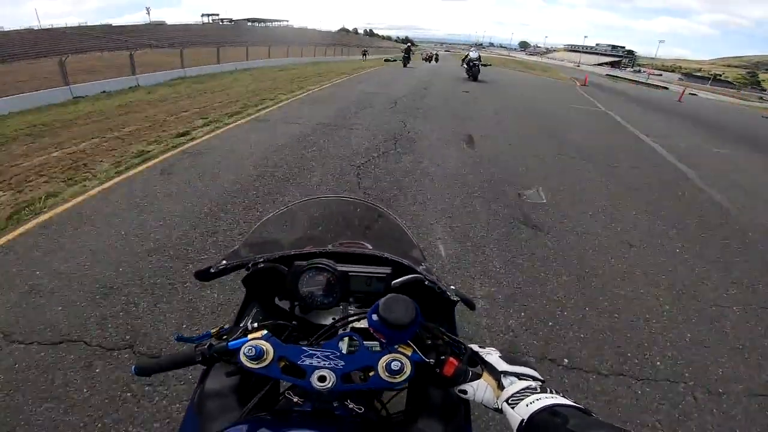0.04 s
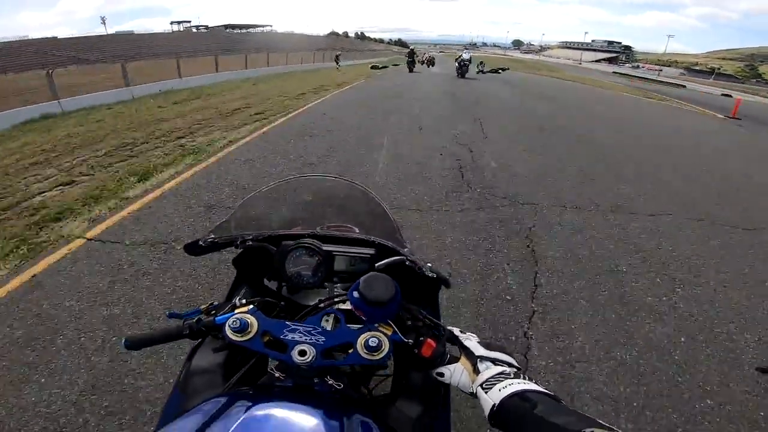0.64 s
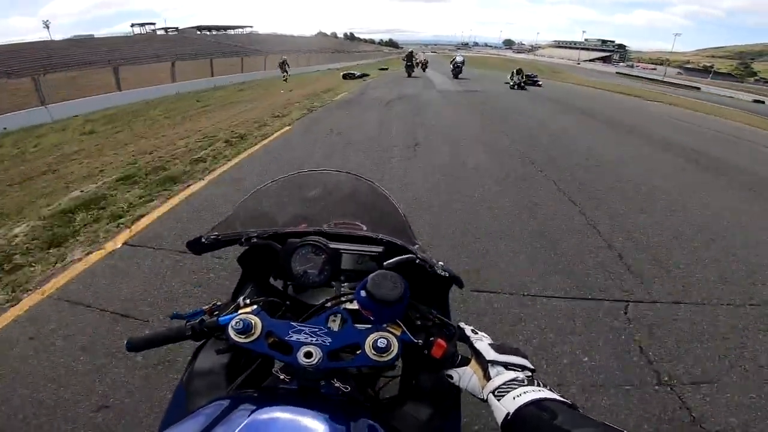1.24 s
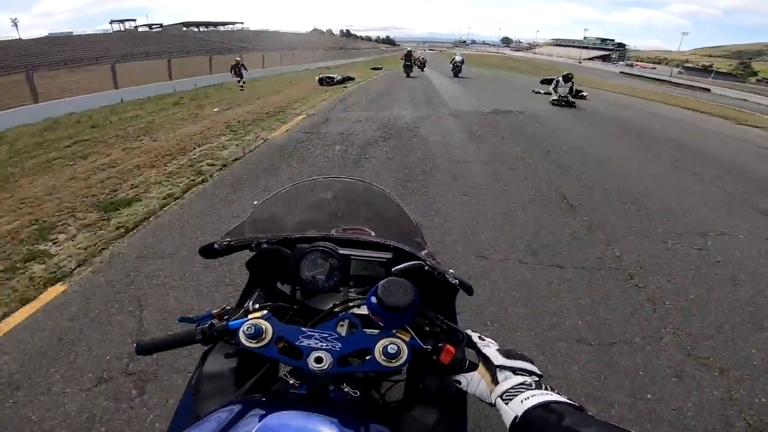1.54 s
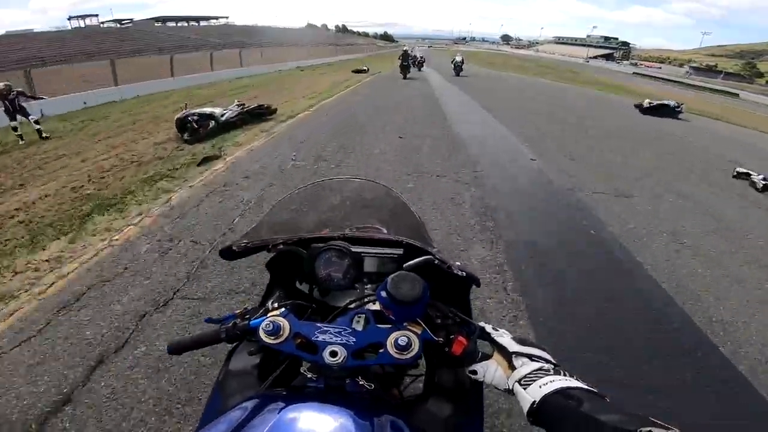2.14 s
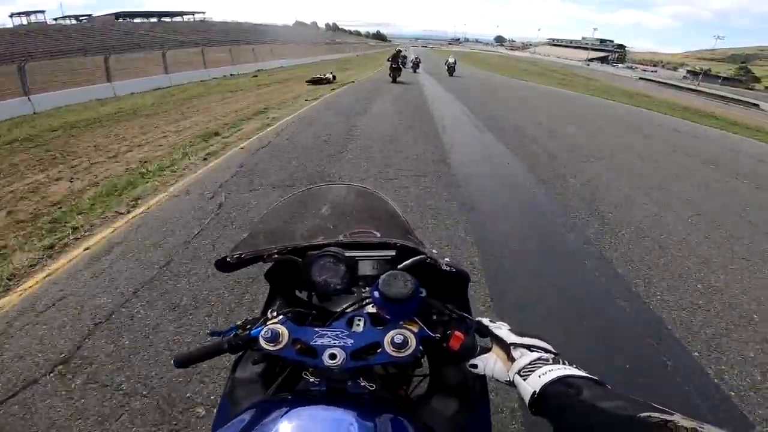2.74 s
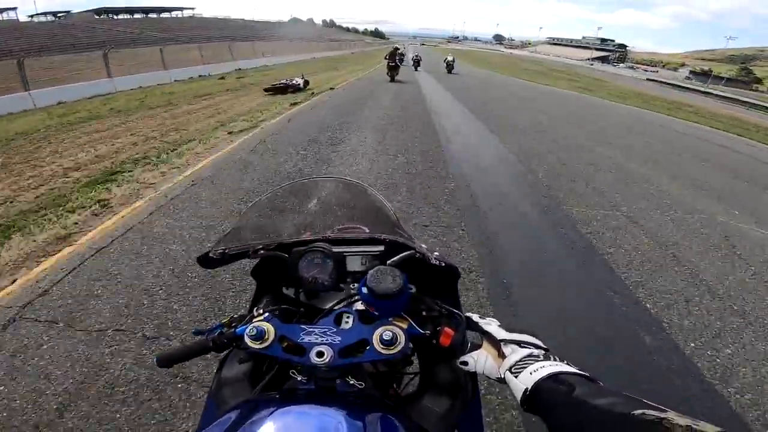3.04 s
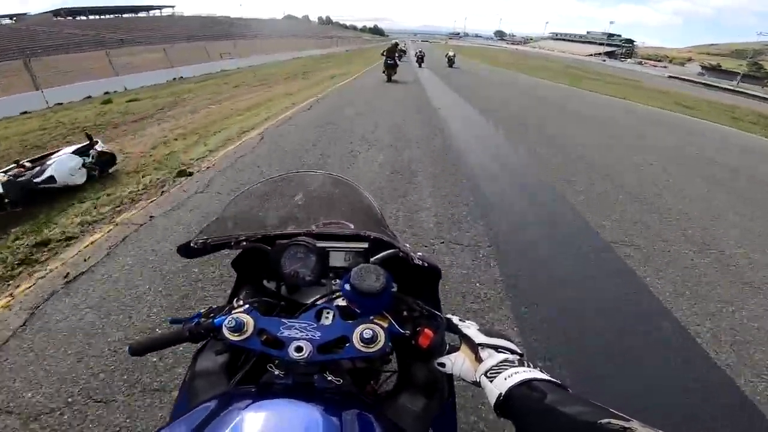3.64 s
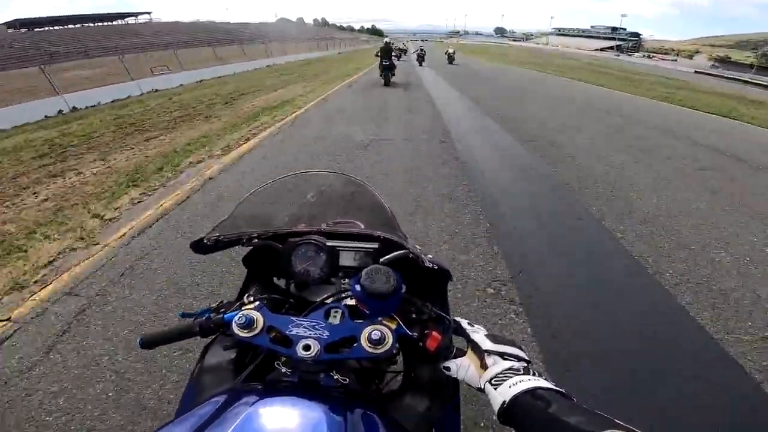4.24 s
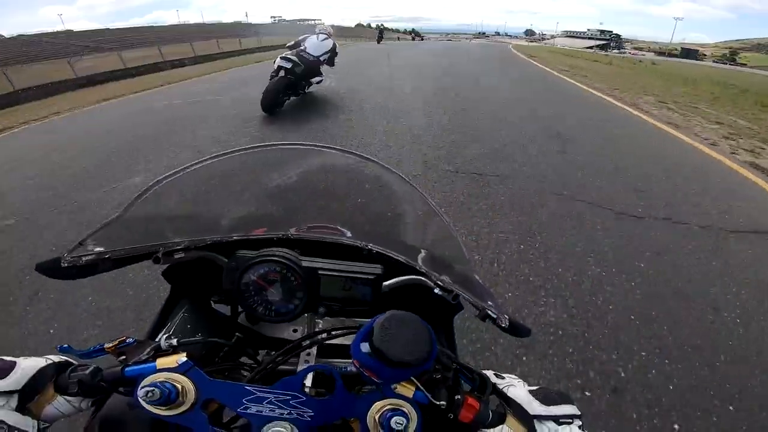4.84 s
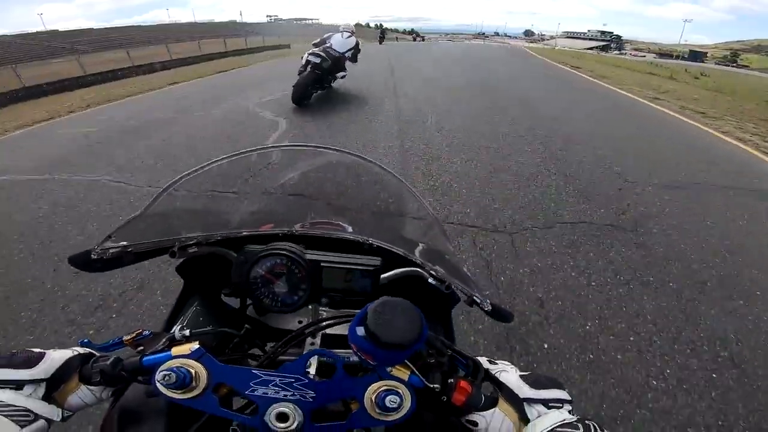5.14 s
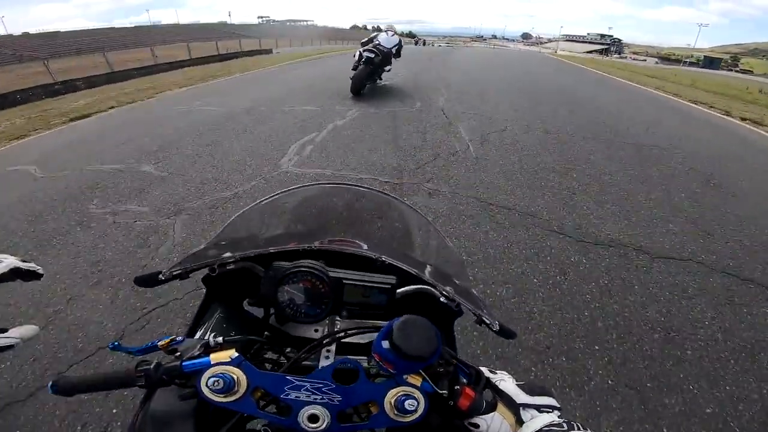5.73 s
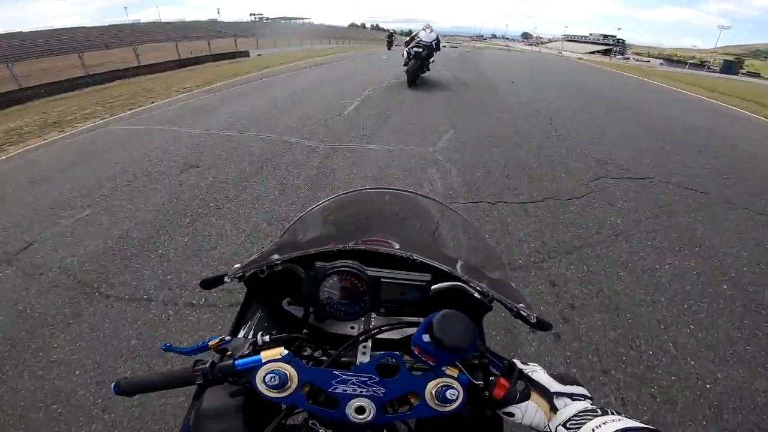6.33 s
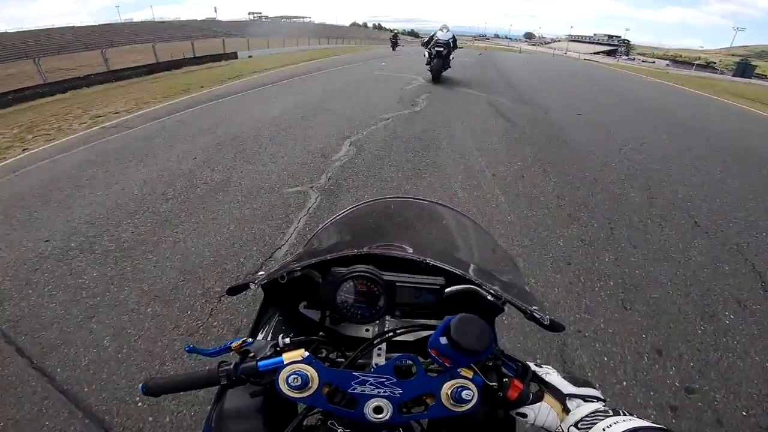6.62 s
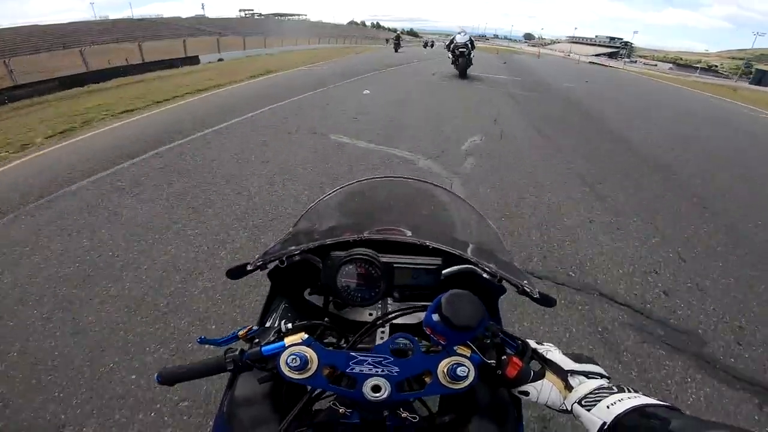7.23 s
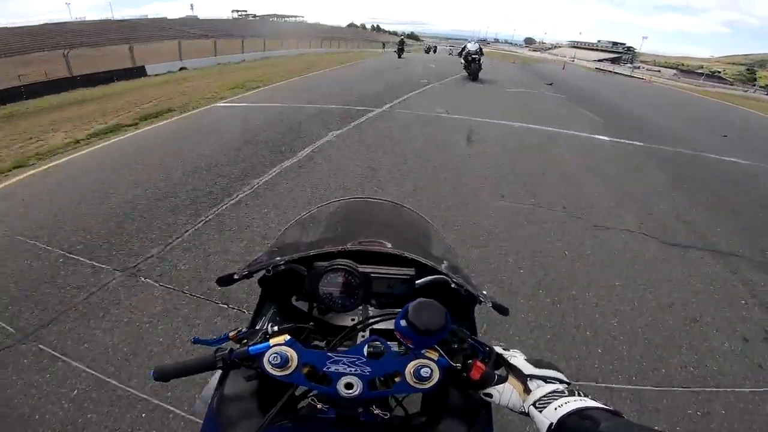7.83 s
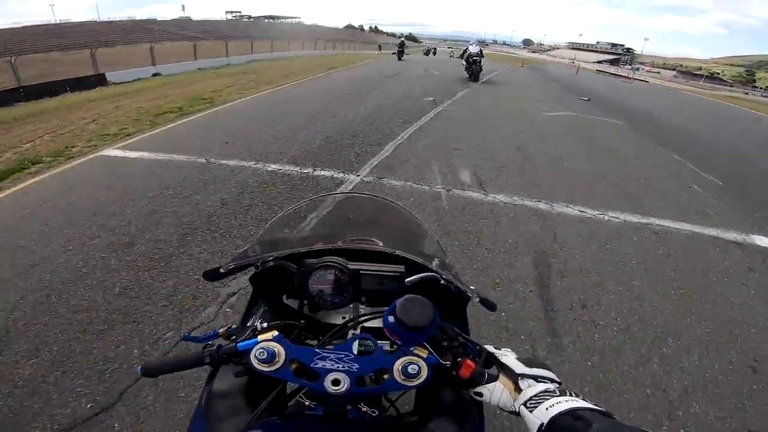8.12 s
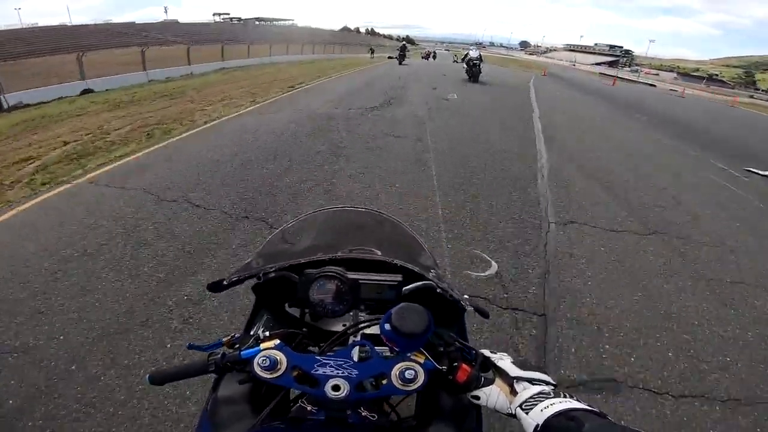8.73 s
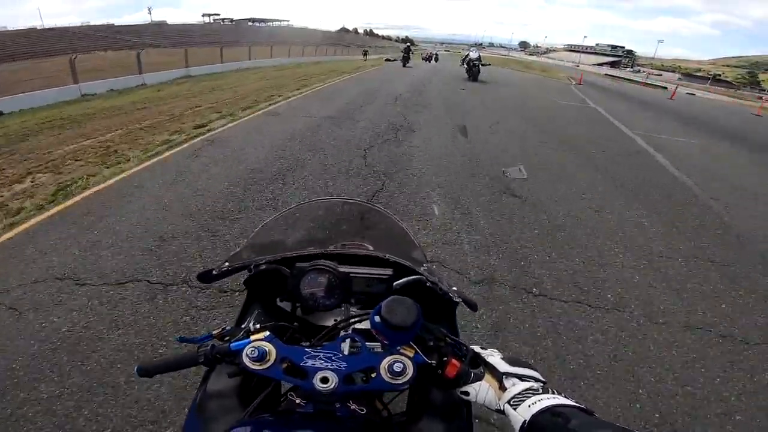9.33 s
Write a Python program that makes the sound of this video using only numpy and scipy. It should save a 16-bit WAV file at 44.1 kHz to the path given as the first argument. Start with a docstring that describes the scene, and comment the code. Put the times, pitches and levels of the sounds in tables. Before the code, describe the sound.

A four-cylinder motorcycle coasts down a race track with the throttle shut, its falling exhaust tone wrapped in gusty wind on an on-board microphone. Faint gear whine and thin brake squeal run through it, a nearby bike swells briefly, and a few stones hit the bodywork. An abrupt jump leads to a slower, duller stretch, where another bike's drone fades away and a light chain rattle grows.

```python
"""Wind buffeting and the sinking exhaust note of a four-cylinder sport bike, heard on board, throttle shut.
Gears whine through casing resonances, panels and brake discs sing thinly, another bike runs alongside.
Grit knocks on the fairing and a limiter ducks after it. Midway the sound jumps to a slower, duller
stretch of the race track behind another bike, where the slack chain starts to rattle in its guard."""
import sys
import numpy as np
from scipy import signal
from scipy.io import wavfile
from scipy.ndimage import uniform_filter1d

SR = 44100
rng = np.random.default_rng(int(sys.argv[2]) if len(sys.argv) > 2 else 0)


def store_pcm(level_fs):
    """Save levels as 16-bit WAV."""
    pcm = np.round(np.clip(level_fs, -1, 1) * 32767).astype(np.int16)
    wavfile.write(sys.argv[1], SR, np.atleast_2d(pcm).T)


N = 417627
T = np.arange(N) / SR
JUMP_S = 4.67

# Engine speed. Each row: time in seconds, four-stroke cycle rate in Hz. Orders are multiples of this rate.
CYCLE_RATE = [(0.0, 83.6), (0.55, 76.0), (1.16, 73.0), (1.55, 71.5), (1.94, 70.5), (2.52, 68.8),
              (3.3, 67.3), (4.08, 66.1), (4.66, 65.2), (4.68, 60.1), (5.48, 57.4), (5.87, 56.3),
              (6.87, 51.3), (7.66, 48.6), (8.06, 46.7), (8.46, 45.1), (8.85, 43.3), (9.45, 41.2)]
# Pitches at which the exhaust tone swells as the revs sink.
# Each row: centre in Hz, width in Hz, relative level in dB.
FAST_SWELLS = [(130.2, 16, -22.5), (134.4, 11, -23), (149, 20, -17.5), (175, 29, -19.5), (271, 9.7, -15),
               (311.4, 95, -13.5), (395, 78, -34.5), (403, 85, -32.5), (466, 50.4, -19.5), (530.4, 22, -27),
               (606, 70, -41.5), (650, 45, -33)]
SLOW_SWELLS = [(84.1, 12, -16.5), (98.65, 7.3, -13), (107.1, 4.6, -12), (113.45, 3.4, -13),
               (118.2, 4.6, -14), (150.3, 15, -6), (171.9, 32.5, -11.5), (197, 30, -18), (204.5, 3.6, -15),
               (221, 10, -23.5)]
# Weak exhaust lines. Each row: order, relative level in dB.
FAST_LINES = [(1, -43.5), (3, -31), (5, -29.5), (7, -44), (9, -54.5), (10, -43), (11, -48.5), (12, -49),
              (13, -52.5), (14, -48.5)]
SLOW_LINES = [(1, -39), (5, -37), (6, -37.5), (7, -43), (8, -42.5), (9, -45), (10, -52), (12, -51.5)]
# Upper exhaust lines settling. Each row: time in seconds, roughness from 0 to 1.
FAST_ROUGHNESS = [(0, .45), (2.9, .5), (3.25, .2), (4.66, .2)]
# Wind spectra. Each row: frequency in Hz, relative density in dB.
RUMBLE = [(18, -6.5), (38, 6.5), (60, -2), (90, -16.5)]
FAST_BUFFET = [(20, -8), (38, -8.5), (58, 8.5), (110, 6.5), (170, 2.8), (230, 0.5), (320, 2.5), (430, -7),
               (560, -13), (700, -36)]
FAST_RUSH = [(350, 1), (550, 10.5), (680, -5.5), (850, -2), (1020, -25), (1300, -17.5), (2000, -45)]
FAST_HISS = [(1100, 0), (1400, -7.5), (1800, -2.5), (2100, -3), (2800, -5.5), (3600, -2), (4400, -14),
             (5300, -17), (6300, -26.5), (7500, -32), (10000, -35.5), (11500, -48), (14500, -54)]
SLOW_BUFFET = [(40, -10.5), (66, 5), (95, 3), (140, 5), (200, 0.5), (270, -14), (350, -20), (480, -29),
               (700, -28.5)]
SLOW_RUSH = [(280, -10), (420, 3.5), (600, -1.5), (850, -5), (1150, -7.5), (1600, -26), (2400, -30.5)]
SLOW_HISS = [(1100, -3.5), (1500, 2), (1900, -11.5), (2400, -10.5), (3000, -31)]
SLOW_TREBLE = [(2300, 1), (3000, -3.5), (3700, -7.5), (5100, -14), (6000, -28), (6500, -40)]
# Fast air stream. Each row: time in seconds, relative levels of rush and hiss in dB.
FAST_AIR = [(0.03, -36, -44), (0.17, -36, -47.5), (1.13, -34, -45), (1.48, -37, -42.5), (1.55, -39, -41.5),
            (2.28, -36.5, -46.5), (3.95, -37, -44), (4.15, -42, -44.5)]
# Slow air stream. Each row: time in seconds, relative levels of rush, hiss and treble in dB.
SLOW_AIR = [(4.7, -32.5, -47.5, -52.5), (5.35, -34, -46, -55), (5.9, -39, -47, -55),
            (7.67, -40.5, -46, -57), (8.15, -40, -46, -55.5), (8.75, -44, -47.5, -58.5),
            (8.95, -48, -51.5, -59.5), (9.4, -44.5, -48.5, -58.5)]
# Gusts. Each row: peak time in seconds, half length in seconds, relative rise in dB.
GUSTS = [(2.4, 0.38, 2.5), (3.603, 0.99, 6), (5.249, 0.3, 12), (8.143, 0.19, 8.5)]
# Bodywork, gear casing and chain guard resonances. Each row: centre in Hz, width in Hz, relative dB.
PANEL_MODES = [(855, 42, -48.5), (2110, 91, -58), (2584, 62, -53.5), (2720, 50, -56), (3080, 90, -53.5),
               (3690, 100, -54.5), (5040, 200, -62.5)]
CASING_MODES = [(844, 100, -44), (735, 80, -50), (965, 55, -51), (1139, 47, -41.5), (1254, 100, -43.5),
                (1410, 140, -49), (2490, 100, -46)]
GUARD_MODES = [(1353, 130, -49.5), (1505, 110, -47), (1662, 100, -52), (1910, 220, -50.5)]
# Gear meshes. Each row: order, relative level in dB, pitch wander in Hz.
MESHES = [(12, 2.5, 16), (17, -1.5, 6), (36, -0.5, 4.6)]
# Treble gear tones. Each row: peak time and half length in seconds, order, relative dB, width in Hz.
WHINES = [(0.76, .24, 40.8, -44.5, 150), (1.15, .15, 46.3, -51, 40), (1.7, .4, 41.9, -46.5, 60),
          (1.72, .4, 38.1, -41.5, 50), (1.68, .33, 36, -44, 35), (2.7, .75, 36, -47, 60),
          (2.55, .25, 44, -48, 50)]
# Brake disc modes. Each row: start and end in seconds, pitch in Hz, width in Hz, level in dB.
SQUEALS = [(1.2, 1.9, 2745, 74, -48.5), (2.45, 3.5, 2605, 60, -48.5), (2.6, 4.1, 2742, 25, -50.5),
           (3.5, 4.1, 2600, 23, -47), (3.45, 4.1, 2490, 110, -51)]
# Grit hits. Each row: start in seconds, thump in dB, lower ring in Hz and dB, upper ring in Hz and dB.
KNOCKS = [(1.6575, -13, 1600, -17, 2350, -17.5), (3.0188, -4, 800, -13, 1900, -25),
          (4.1045, -3, 1980, -13.5, 3480, -23), (4.1415, -1, 1680, -14, 3250, -16.5),
          (4.26, -24, 900, -28, 1650, -27), (4.289, -28, 3000, -24, 4700, -38),
          (4.35, -28, 1700, -28, 2850, -27)]
# Metal fittings. Each row: pitch in Hz, level in dB re the upper ring, 60 dB decay time in seconds.
FITTINGS = [(2200, -21, .04), (2620, -6, .005), (2620, -18, .06), (3596, -28, .5), (3850, -6, .005)]
# Other bikes. Each row: time in seconds, firing rate in Hz, firing, crank and octave levels in dB.
BIKE_BESIDE = [(1.7, 418, -30, -54, -63), (2.0, 420.7, -24, -49, -58.5), (2.2, 419.2, -20, -38.5, -46),
               (2.53, 416, -19.5, -43.5, -59), (2.7, 410, -50, -54, -64)]
BIKE_AHEAD = [(4.62, 260, -41, -15, -37.5), (5.0, 257.4, -39, -16, -36.5), (5.35, 248.4, -24.5, -20, -38),
              (5.7, 239.3, -18.5, -24, -33.5), (6.1, 229.6, -22, -30, -39),
              (6.6, 219.2, -35.5, -39.5, -56.5), (7.3, 208.3, -43.5, -44, -50)]
# Airbox resonances. Each row: centre in Hz, width in Hz, linear boost.
AIRBOX_MODES = [(407, 26, 2.3), (249, 14, 3.1), (290, 26, 0.97), (347.7, 7.6, 1), (454, 10, 0.65)]
# Weak lines, exhaust burble and chain rattle in the slow stretch. Each row: time in seconds, gain in dB.
SLOW_LINES_GAIN = [(4.7, -7.5), (5.9, -9.5), (6.4, -8.5), (7.6, -12.5), (8.1, -5), (8.6, -8.5), (8.9, -9.5),
                   (9.4, -3.5)]
BURBLE_GAIN = [(4.7, -19.5), (5.05, -21), (5.4, -27), (6.2, -32), (7.0, -42)]
RATTLE_GAIN = [(4.7, -8), (7.3, -9.5), (7.95, -0.5), (8.65, 0), (8.95, -2), (9.4, -.5)]


def from_db(db):
    """Decibels to gain."""
    return 10 ** (np.asarray(db) / 20)


def unit_rms(x):
    """Scale to rms 1."""
    return x / np.sqrt(np.mean(x ** 2) + 1e-20)


def curves(rows):
    """Columns of a time table at every sample."""
    times_s, *columns = np.transpose(rows)
    return [np.interp(T, times_s, column) for column in columns]


def drift(rate_hz):
    """Smooth random wander, rms about 1."""
    step, warmup = 40, 2000
    pole = np.exp(-2 * np.pi * rate_hz * step / SR)
    white = rng.standard_normal(N // step + warmup + 2)
    slow = signal.lfilter([1], [1, -2 * pole, pole * pole], white)[warmup:]
    return np.interp(np.arange(N) / step, np.arange(len(slow)), unit_rms(slow))


def phase_rad(hz):
    """Running phase of a frequency curve."""
    return 2 * np.pi * np.cumsum(hz) / SR


def narrow_noise(hz, width_hz):
    """Noise band around a fixed or sliding pitch, rms 1."""
    lowpass = signal.butter(2, width_hz / 2, fs=SR, output="sos")
    a, b = signal.sosfilt(lowpass, rng.standard_normal((2, N)))
    carrier_rad = phase_rad(np.full(N, hz))
    return unit_rms(a * np.sin(carrier_rad) + b * np.cos(carrier_rad))


def resonate(x, hz, width_hz):
    """One resonance, unity gain at its centre."""
    return signal.lfilter(*signal.iirpeak(hz, hz / width_hz, fs=SR), x)


def swept_gain(peaks, hz):
    """Gain of a tone sliding slowly through level peaks at fixed pitches."""
    step = 100
    power = sum((from_db(db) / (1 + (2 * (hz[::step] - centre_hz) / width_hz) ** 2)) ** 2
                for centre_hz, width_hz, db in peaks)
    return np.interp(T, T[::step], np.sqrt(power))


def line_db(swells, hz):
    """Level of an exhaust line: swells at each listed pitch, wavers at random."""
    return 20 * np.log10(swept_gain(swells, hz)) + 1.4 * drift(4.9)


def exhaust_lines(cycle_rad, lines, rough, rough_hz):
    """Lines (order, dB) locked to the engine cycle; uneven burns shake their level and phase."""
    out = 0
    for order, db in lines:
        line_rad = round(order) * cycle_rad + 2 * np.pi * rng.random()
        in_phase = (1 + rough * drift(rough_hz)) * np.sin(line_rad)
        quadrature = rough * drift(rough_hz) * np.cos(line_rad)
        out += from_db(db) * (in_phase + quadrature)
    return np.sqrt(2) * out


def fast_exhaust(cycle_hz, cycle_rad):
    """High revs on the overrun: firm crank and firing tones (orders 2, 4) under rougher lines."""
    crank, firing, *overtones = [(k, line_db(FAST_SWELLS, k * cycle_hz)) for k in (2, 4, 6, 8)]
    roughness, = curves(FAST_ROUGHNESS)
    main = exhaust_lines(cycle_rad, [crank, firing], rough=.07, rough_hz=18)
    upper = exhaust_lines(cycle_rad, overtones, roughness, rough_hz=14)
    weak = exhaust_lines(cycle_rad, FAST_LINES, rough=.06, rough_hz=22)
    return from_db(1.3) * main + from_db(-1.5) * upper + from_db(-3.5) * weak


def turbulence(spectrum, eddy_db, eddy_hz):
    """Third-octave noise bands, each swelling with its own eddies; rms 1."""
    hz, db = np.transpose(spectrum)
    edges_hz = 18 * 2 ** (np.arange(30) / 3)
    white, out = rng.standard_normal((2, N)), 0
    for k, (low, high) in enumerate(zip(edges_hz, edges_hz[1:])):
        if high > hz[0] and low < hz[-1]:
            bandpass = signal.butter(3, [low, high], "band", fs=SR, output="sos")
            band_db = np.interp(np.log(low * high) / 2, np.log(hz), db)
            out += signal.sosfilt(bandpass, white[k % 2]) * from_db(band_db + eddy_db * drift(eddy_hz))
    return unit_rms(out)


def gusts_db():
    """Rise of the wind over its steady level."""
    return sum(db * np.exp(-((T - peak_s) / half_s) ** 2) for peak_s, half_s, db in GUSTS)


def throb(cycle_rad, depth):
    """Gain pulsing with the crank, from valves and pistons."""
    return 1 + depth * (np.cos(2 * cycle_rad) + .5 * np.cos(cycle_rad) + .5 * np.cos(4 * cycle_rad))


def fast_wind(cycle_rad):
    """Bright air stream over gusty buffeting; the hiss sways as the rider moves."""
    rush_db, hiss_db = curves(FAST_AIR)
    buffet = from_db(-15 + .084 * gusts_db()) * turbulence(FAST_BUFFET, eddy_db=3, eddy_hz=58)
    rush = from_db(rush_db + 9) * turbulence(FAST_RUSH, eddy_db=1, eddy_hz=14)
    sway_db = .94 * drift(4)
    hiss = from_db(hiss_db + 4.5 + sway_db) * turbulence(FAST_HISS, eddy_db=1.75, eddy_hz=38)
    rumble = from_db(-37 + 1.2 * gusts_db()) * turbulence(RUMBLE, eddy_db=2, eddy_hz=16)
    return buffet + rumble + rush + hiss * throb(cycle_rad, depth=.071)


def panels():
    """The air stream excites narrow bodywork resonances."""
    return sum(from_db(db) * unit_rms(resonate(rng.standard_normal(N), hz, width_hz))
               for hz, width_hz, db in PANEL_MODES)


def chain_rollers(cycle_hz):
    """Uneven roller beats: a noise band sinking with the revs."""
    return from_db(-47) * narrow_noise(39.5 * cycle_hz, width_hz=750)


def gears(cycle_hz, cycle_rad):
    """Mesh tones sweep through casing resonances; backlash shakes pitch and level."""
    out = 0
    for order, db, wander_hz in MESHES:
        wander_rad = phase_rad(wander_hz * drift(20))
        tone = np.sqrt(2) * np.sin(order * cycle_rad + wander_rad)
        shake = (1 + .5 * drift(44)) * from_db(1.6 * drift(5) - .8)
        out += from_db(db) * swept_gain(CASING_MODES, order * cycle_hz) * tone * shake
    return out


def gear_whines(cycle_hz):
    """High, grainy mesh tones rise out of the hiss and fade."""
    out = 0
    for peak_s, half_s, order, db, width_hz in WHINES:
        swell = np.exp(-((T - peak_s) / half_s) ** 2)
        out += from_db(db + 1.3) * swell * narrow_noise(order * cycle_hz, width_hz)
    return out


def brakes(ramp_s=.08):
    """Disc modes sing at fixed pitch while the pads drag."""
    out = 0
    for start_s, end_s, hz, width_hz, db in SQUEALS:
        drag = np.clip(np.minimum(T - start_s, end_s - T) / ramp_s + .5, 0, 1)
        out += from_db(db) * drag * narrow_noise(hz, width_hz)
    return out


def ping(start_s, hz, db, swell_s=.00052):
    """Short ring: swells during contact, dies quickly."""
    age_s = np.clip(T - start_s, 0, 20 * swell_s)
    envelope = age_s / swell_s * np.exp(1 - age_s / swell_s)
    return from_db(db) * envelope * np.sin(2 * np.pi * hz * age_s)


def ring(clicks, hz, t60_s):
    """Each click starts a decaying sine of its own height."""
    pole, step_rad = from_db(-60 / (t60_s * SR)), 2 * np.pi * hz / SR
    feedback = [1, -2 * pole * np.cos(step_rad), pole * pole]
    return signal.lfilter([0, np.sin(step_rad)], feedback, clicks + 1e-18)


def grit(thump_hz=370, contact_hz=5200):
    """Stones thump the fairing, ring the struck spot at two pitches and set the fittings ringing."""
    out, clicks = np.zeros(N), np.zeros(N)
    for start_s, thump_db, lower_hz, lower_db, upper_hz, upper_db in KNOCKS:
        out += ping(start_s, thump_hz, thump_db, swell_s=.0014)
        out += ping(start_s, lower_hz, lower_db) + ping(start_s, upper_hz, upper_db)
        clicks[round(start_s * SR)] = from_db(upper_db)
    out += sum(ring(from_db(db) * clicks, hz, t60_s) for hz, db, t60_s in FITTINGS)
    # plastic yields: soft contact
    return signal.sosfilt(signal.butter(4, contact_hz, fs=SR, output="sos"), out)


def other_bike(rows, gear_db, fade_s=.051):
    """Crank line, firing tone, octave and gear whine of a bike entering and leaving earshot."""
    firing_hz, firing_db, crank_db, octave_db = curves(rows)
    fade = np.clip(np.minimum(T - rows[0][0], rows[-1][0] - T) / fade_s, 0, 1)
    lines = [(2, crank_db), (4, firing_db), (8, octave_db), (17, firing_db + gear_db)]
    return fade * exhaust_lines(phase_rad(firing_hz / 4), lines, rough=.18, rough_hz=10)


def slow_exhaust(cycle_hz, cycle_rad):
    """Lumpy drone: unequal cylinders add order 3, the airbox lifts weak lines, late burns burble."""
    crank_db, uneven_db, firing_db = [line_db(SLOW_SWELLS, k * cycle_hz) for k in (2, 3, 4)]
    main = exhaust_lines(cycle_rad, [(2, crank_db), (4, firing_db)], rough=.08, rough_hz=12)
    main += exhaust_lines(cycle_rad, [(3, uneven_db - 11.5)], rough=.45, rough_hz=9)
    weak = exhaust_lines(cycle_rad, SLOW_LINES, rough=.8, rough_hz=17)
    for hz, width_hz, boost in AIRBOX_MODES:
        weak += boost * resonate(weak, hz, width_hz)
    weak_db, = curves(SLOW_LINES_GAIN)
    burble_db, = curves(BURBLE_GAIN)
    burble = narrow_noise(2.42 * cycle_hz, width_hz=28)
    return from_db(1.22) * main + from_db(weak_db) * weak + from_db(burble_db) * burble


def slow_wind(cycle_rad):
    """Dull air stream easing as the bike slows; gusts mainly lift the deep rumble."""
    rush_db, hiss_db, treble_db = curves(SLOW_AIR)
    buffet_db = -15.5 + .18 * (rush_db - rush_db.max()) + .072 * gusts_db()
    buffet = from_db(buffet_db) * turbulence(SLOW_BUFFET, eddy_db=1.6, eddy_hz=19)
    rumble = from_db(-28.5 + gusts_db()) * turbulence(RUMBLE, eddy_db=2, eddy_hz=5.1)
    treble = from_db(treble_db) * turbulence(SLOW_TREBLE, eddy_db=1.2, eddy_hz=30)
    rush = from_db(rush_db + 4) * turbulence(SLOW_RUSH, eddy_db=1.2, eddy_hz=22)
    hiss = from_db(hiss_db + 4.5) * turbulence(SLOW_HISS, eddy_db=1.2, eddy_hz=18)
    return buffet + rumble + rush + hiss * throb(cycle_rad, depth=.14) + treble


def chain_guard(cycle_rad):
    """The slack chain shakes its guard, pulsing with the crank, harder at low speed."""
    rattle_db, = curves(RATTLE_GAIN)
    rattle = sum(from_db(db) * narrow_noise(hz, width_hz) for hz, width_hz, db in GUARD_MODES)
    return from_db(rattle_db + 1.3 * drift(25)) * rattle * throb(cycle_rad, depth=.22)


def scene():
    """The fast stretch jumps to the slow one with a small tick; the gears run through both."""
    cycle_hz, = curves(CYCLE_RATE)
    cycle_rad = phase_rad(cycle_hz * (1 + .001 * drift(8)))
    fast = chain_rollers(cycle_hz) + fast_exhaust(cycle_hz, cycle_rad) + fast_wind(cycle_rad) + panels()
    fast += other_bike(BIKE_BESIDE, gear_db=-39) + gear_whines(cycle_hz) + brakes() + grit()
    slow = slow_exhaust(cycle_hz, cycle_rad) + slow_wind(cycle_rad)
    slow += other_bike(BIKE_AHEAD, gear_db=-27) + chain_guard(cycle_rad)
    slow_share = np.clip((T - JUMP_S) / .0046, 0, 1)
    tick = from_db(-11.5) * (T >= JUMP_S) * np.exp(-np.abs(T - JUMP_S) / .0016)
    mix = (1 - slow_share) * fast + slow_share * slow + gears(cycle_hz, cycle_rad) + tick
    fade_in = np.minimum(T / .004, 1)
    return (fade_in * mix)[None]


def limiter_gain(x, ceiling_db, release_db_per_s):
    """Gain drops within milliseconds of a peak, then recovers steadily."""
    over_db = np.maximum(20 * np.log10(np.abs(x) + 1e-9) - ceiling_db, 0)
    held_db = np.maximum.accumulate(over_db + release_db_per_s * T, axis=-1) - release_db_per_s * T
    return from_db(-uniform_filter1d(uniform_filter1d(held_db, size=133), size=89))


def record(dry, crossover_hz=1000, stopband_hz=16610):
    """Bass is limited on its own, treble peaks duck everything, the top is cut."""
    bass = signal.sosfiltfilt(signal.butter(4, crossover_hz, fs=SR, output="sos"), dry)
    treble = dry - bass
    held = treble + bass * limiter_gain(bass, ceiling_db=-4, release_db_per_s=110)
    ducked = from_db(-.5) * held * limiter_gain(treble, ceiling_db=-18, release_db_per_s=68)
    return signal.sosfilt(signal.cheby2(12, 70, stopband_hz, fs=SR, output="sos"), ducked)


dry = scene()
out = record(dry)
store_pcm(out)
```